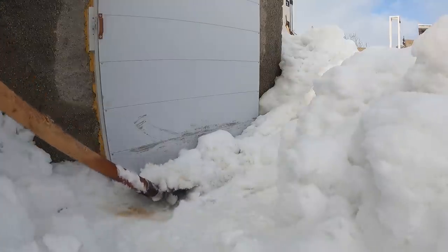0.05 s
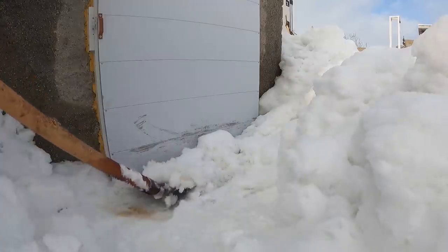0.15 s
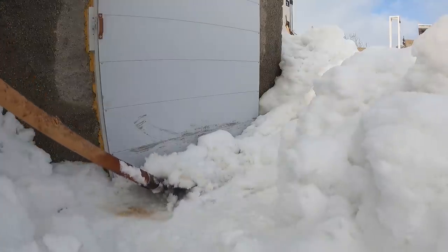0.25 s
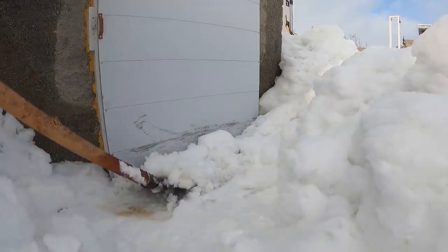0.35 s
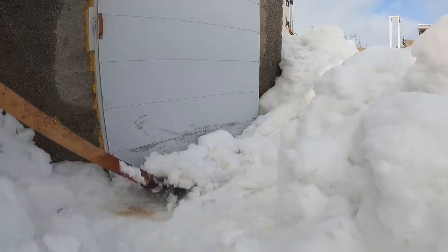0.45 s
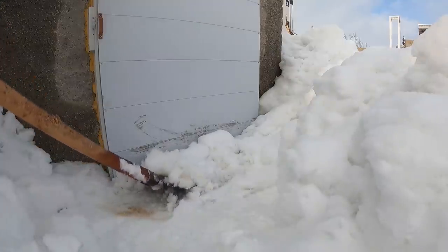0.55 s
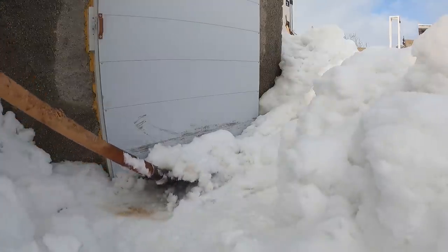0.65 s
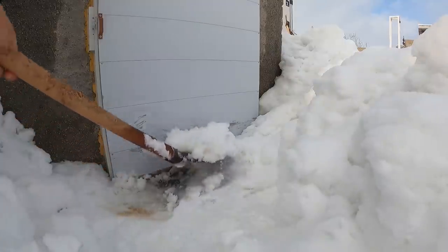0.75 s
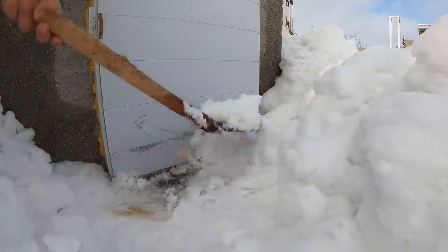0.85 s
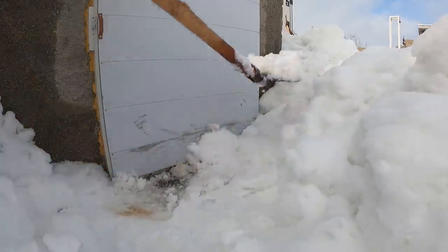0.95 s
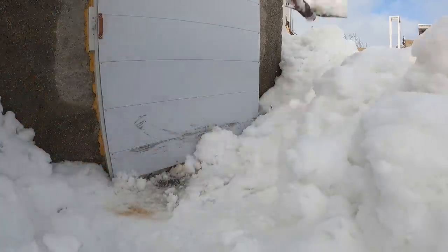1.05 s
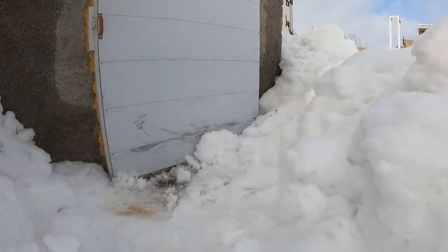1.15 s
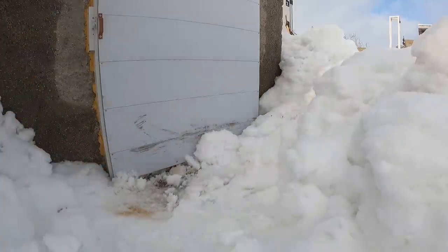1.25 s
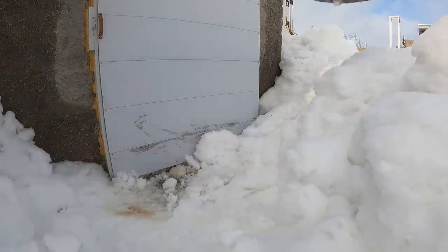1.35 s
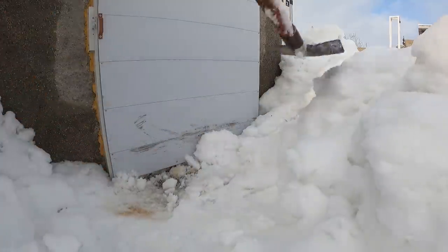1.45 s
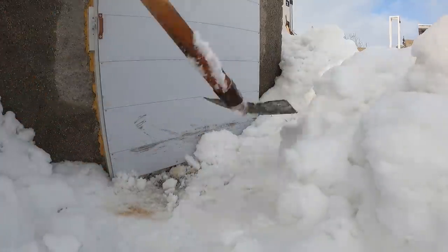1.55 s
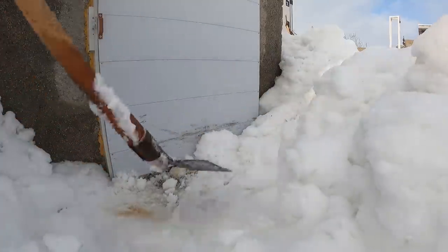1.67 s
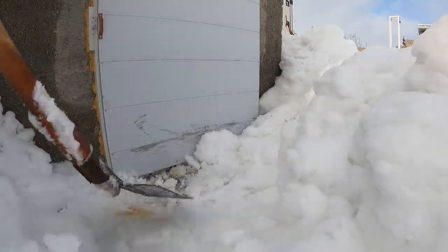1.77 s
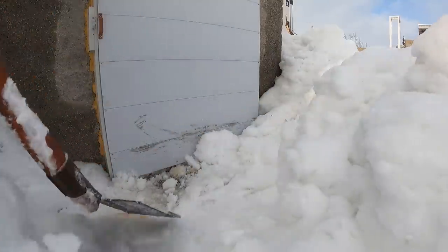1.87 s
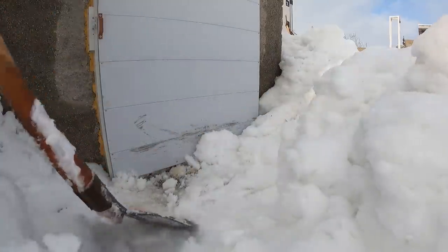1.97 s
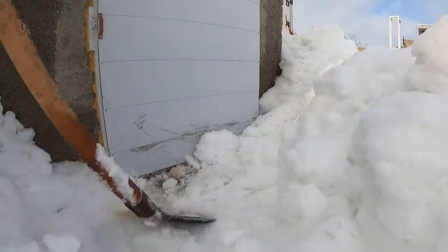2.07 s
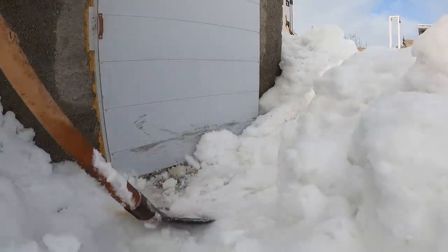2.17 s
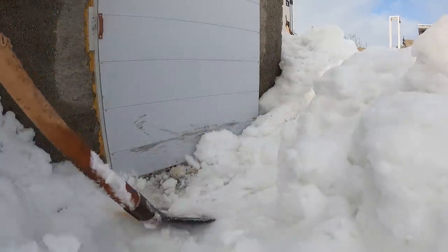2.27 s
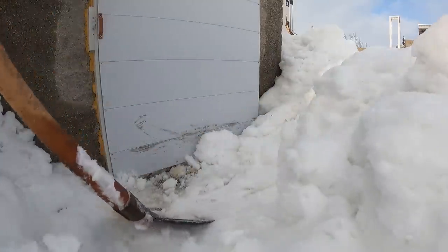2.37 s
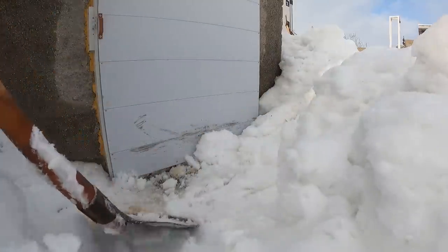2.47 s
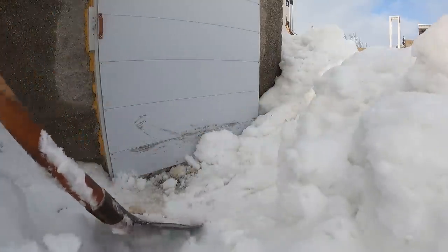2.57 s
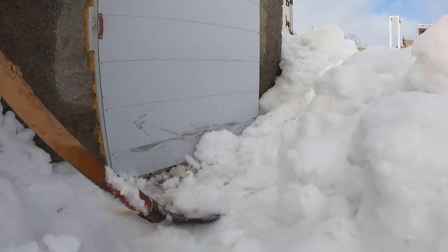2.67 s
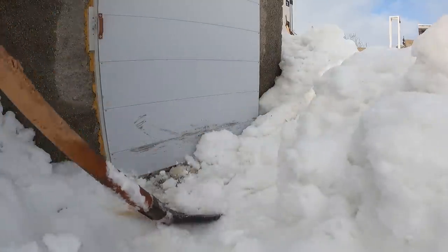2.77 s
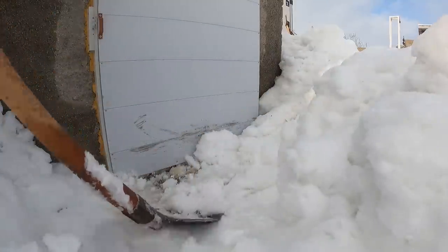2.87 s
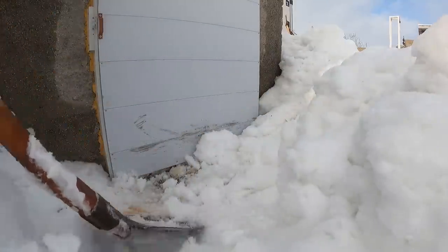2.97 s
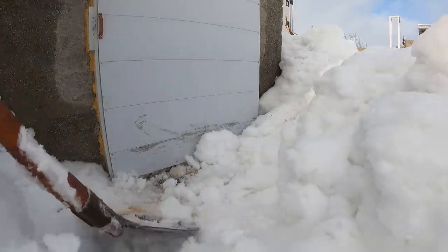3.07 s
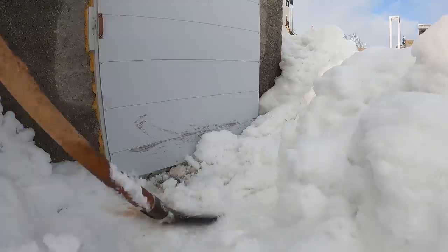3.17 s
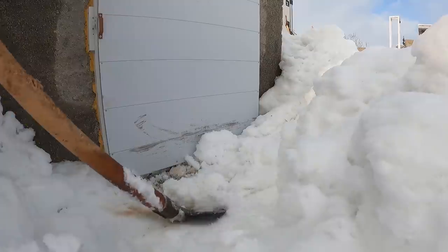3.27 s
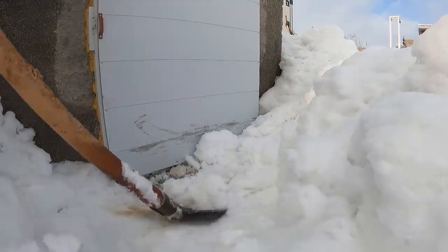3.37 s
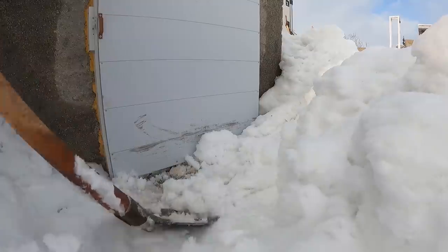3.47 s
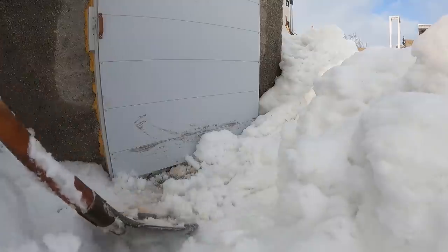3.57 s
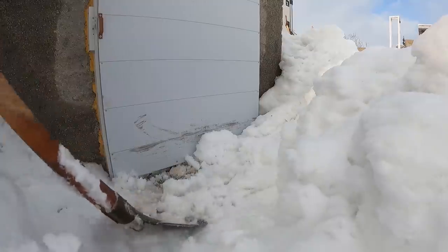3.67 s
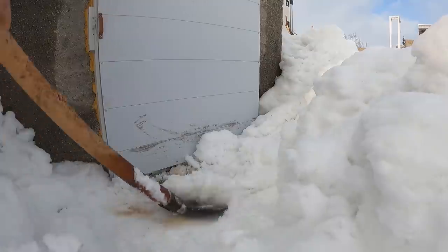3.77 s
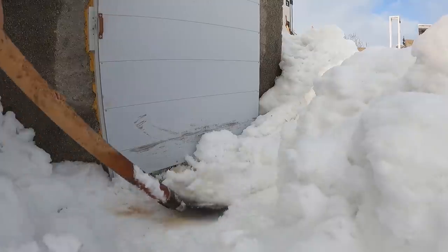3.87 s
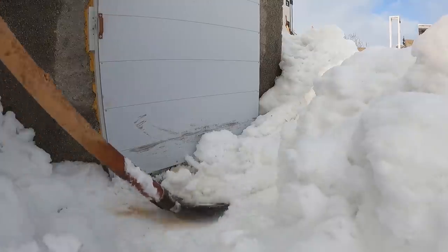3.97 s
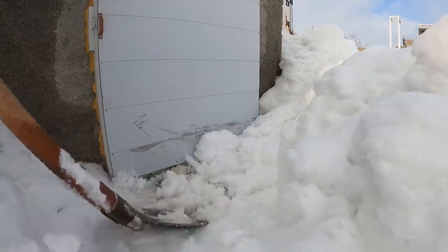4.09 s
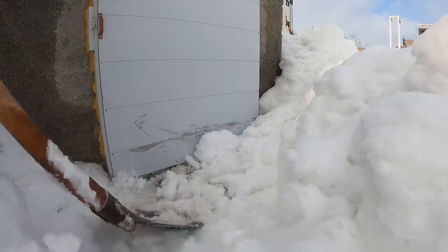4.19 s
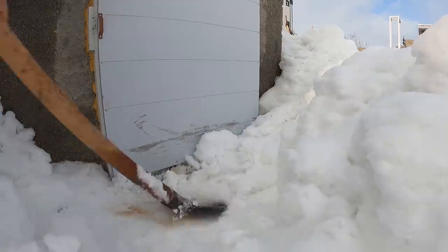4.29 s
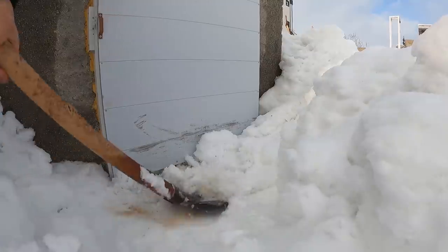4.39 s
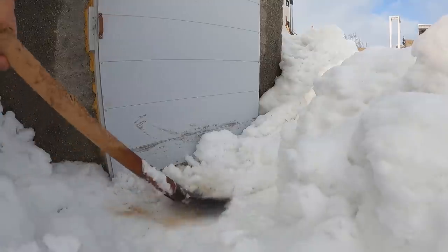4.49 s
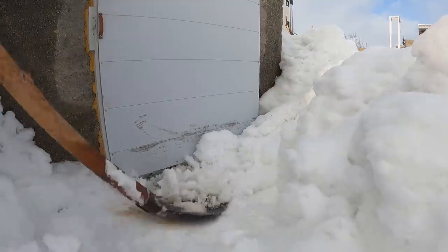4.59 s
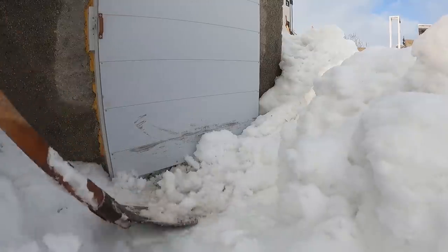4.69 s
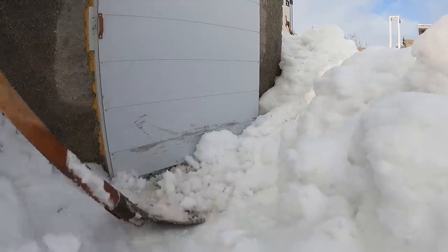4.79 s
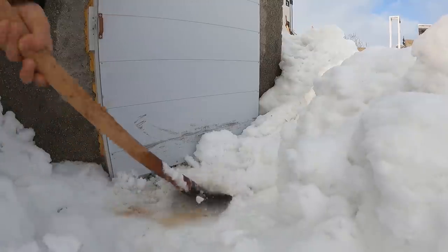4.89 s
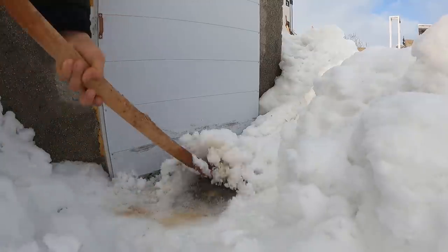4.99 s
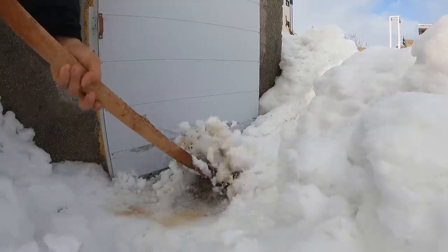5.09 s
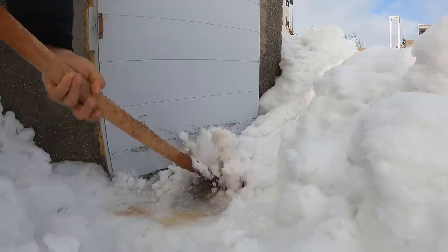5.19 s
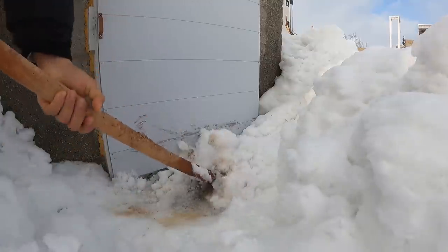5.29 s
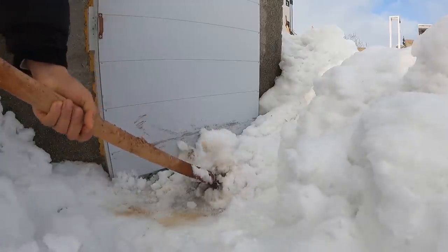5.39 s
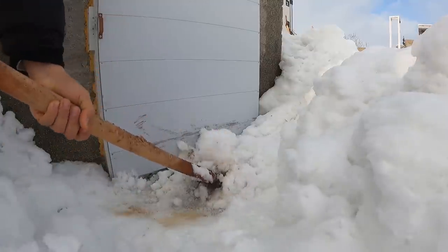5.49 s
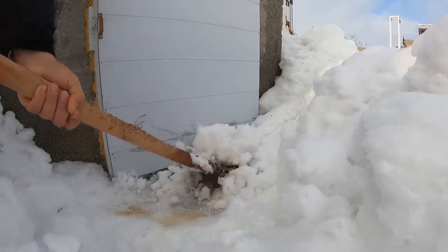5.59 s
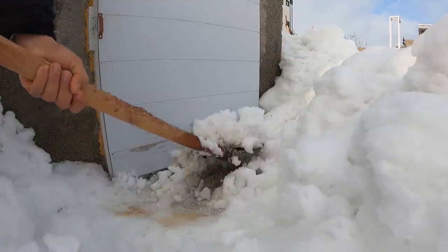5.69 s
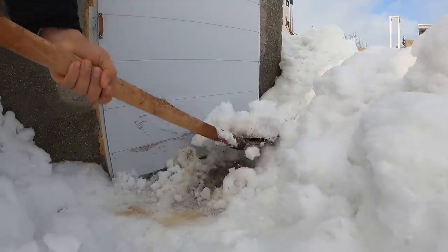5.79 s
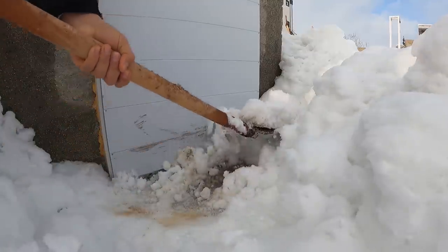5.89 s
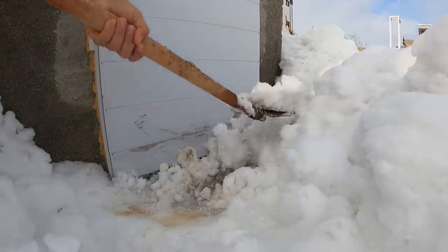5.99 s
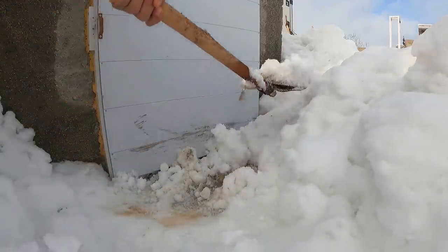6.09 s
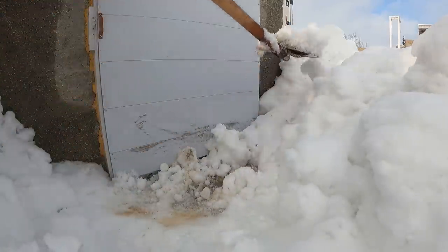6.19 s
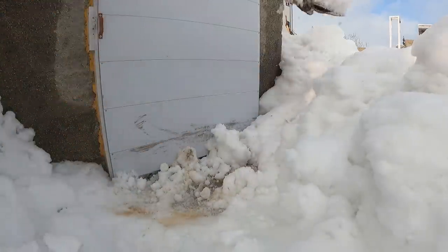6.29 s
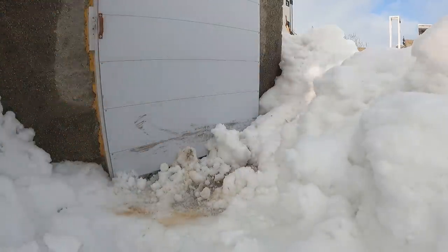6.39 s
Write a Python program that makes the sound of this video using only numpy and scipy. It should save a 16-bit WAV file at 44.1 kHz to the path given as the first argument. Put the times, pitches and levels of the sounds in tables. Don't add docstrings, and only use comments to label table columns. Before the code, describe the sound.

A very close microphone near the ground catches snow shovelling. A load lifts with a dull thump and crumbling, clumps tick and snap, and there is a quiet pause. Then short, bright, gritty stabs crunch at irregular half-second spacing with scraping pulls between. One long hard push peaks, snaps, and trails into handle knocks and trickling powder over a faint outdoor hush.

```python
import sys
import numpy as np
from scipy import signal
from scipy.fft import rfft, irfft, next_fast_len
from scipy.io import wavfile
from scipy.ndimage import uniform_filter1d, map_coordinates

SR = 44100
rng = np.random.default_rng(int(sys.argv[2]) if len(sys.argv) > 2 else 0)


def pcm_store(signal):
    levels = np.round(np.clip(np.atleast_2d(signal), -1, 1) * 32767)
    wavfile.write(sys.argv[1], SR, levels.astype(np.int16).T)


def boost(x):
    u = np.asarray(x, float) / 20
    return 10 ** u


N = 284445
GRID = np.arange(0, N / SR + .002, .001)

# f/Hz, density level/dB
CRYSTALS = [(820, -53.5), (1400, -2), (1490, -1.5), (2250, 1.5), (2750, -1.5), (4030, -2.5), (4970, 0),
            (6210, -4), (7080, -4.5), (11900, -22), (15500, -40)]
# f/Hz, density level/dB
PACKED = [(100, -41), (170, -5.5), (318, -2.5), (483, -0.5), (829, -7.5), (950, -8), (1240, -9),
          (2090, -120)]


def unit(x):
    return x / np.sqrt(np.mean(x ** 2) + 1e-20)


def along(points, hz):
    f, v = np.transpose(points)
    return np.interp(np.log(hz + 1), np.log(f + 1), v)


def wobble(rate):
    return map_coordinates(rng.standard_normal(int(N * rate / SR) + 4), [np.arange(N) * rate / SR])


def filtered(x, response):
    m = next_fast_len(N + SR // 4)
    return irfft(rfft(x, m) * response(np.fft.rfftfreq(m, 1 / SR)), m)[..., :N]


def coloured(x, spectrum):
    return unit(filtered(x, lambda hz: boost(along(spectrum, hz))))


def modes(table):
    def response(f):
        total = 0
        for k, (centre, width, db) in enumerate(table):
            damping = 1j * f * width
            total = total + (-1) ** k * boost(db) * damping / (centre ** 2 - f ** 2 + damping)
        return total
    return response


def grit(per_second, spread_db, smooth):
    chance, size = rng.random((2, N))
    heights = boost(-spread_db * np.log(1 - size)) * rng.choice([-1, 1], N)
    return unit((chance < per_second / SR) * heights) + smooth * rng.standard_normal(N)


def patchy(x, depth_db, bins, frames):
    z = signal.stft(x, nperseg=256)[2]
    field = uniform_filter1d(rng.standard_normal(z.shape), bins, 0)
    field = uniform_filter1d(field, frames, 1)
    return signal.istft(z * boost(depth_db * unit(field)), nperseg=256)[1][:N]


def swell(s, length, db, end_db, rate):
    end = s + length
    hold = np.interp(GRID, [s, end + 1e-4], [db, end_db])
    return hold - rate[0] * np.maximum(s - GRID, 0) - rate[1] * np.maximum(GRID - end, 0)


def loudest(levels):
    return np.interp(np.arange(N) / SR, GRID, np.max(levels, axis=0))


def scrape():
    # f/Hz, density level/dB
    loose = [(820, -45), (1400, -11), (1600, -2.5), (2220, -0.5), (2590, -3), (4880, -5.5), (7290, -8.5),
             (8920, -15.5), (12100, -22.5), (15500, -41.5)]
    # f/Hz, width/Hz, level/dB
    edge_modes = [(996, 260, 0.5), (1200, 170, 4), (1344, 220, -2)]
    # f/Hz, width/Hz, level/dB
    sheet_modes = [(1720, 77, -9), (2314, 36, 7.5), (2994, 66, -11), (5060, 36, 2), (7460, 300, -7.5)]
    hiss_db, edge_db, packed_db = strokes()
    jerk = .7 * wobble(50) + 1.1 * wobble(160)
    breakage = grit(9000, spread_db=2, smooth=.85)
    breakage = patchy(breakage, 2.05, bins=2, frames=5)
    breakage = patchy(breakage, .8, bins=9, frames=10)

    hard = np.clip((hiss_db + 35.5) / 9, 0, 1)
    sheet = modes(sheet_modes)
    crushed = coloured(filtered(breakage, lambda hz: 1 + 0.64 * sheet(hz)), CRYSTALS)
    hiss = hard * crushed + (1 - hard) * coloured(breakage, loose)

    edge = filtered(breakage, modes(edge_modes))
    edge = unit(filtered(edge, modes([(1250, 1020, 0)])))
    crunch = patchy(grit(1200, spread_db=2.0, smooth=1.1), 3.2, bins=1, frames=8)
    crunch = coloured(crunch, PACKED)

    edge_level = hiss_db + edge_db + jerk + 0.69 * wobble(47) - 4.5
    crunch_level = hiss_db + packed_db + 0.5 * jerk + 0.65 * wobble(45) - 1.28
    return boost(hiss_db + jerk + 0.51) * hiss + boost(edge_level) * edge + boost(crunch_level) * crunch


def strokes():
    # t/s, length/s, hiss level/dB, hiss end level/dB
    ploughs = [
        (2.15, .062, -17, -16),
        (2.745, .034, -22, -17),
        (3.272, .042, -21.5, -22.5),
        (3.812, .044, -22, -21.5),
        (4.378, .022, -24.5, -24.5),
        (4.985, .08, -14.5, -16),
        (5.002, .01, -13.5, -13.5),
        (5.065, .066, -16.5, -21),
    ]
    # t/s, length/s, hiss level/dB, hiss end level/dB, crunch level/dB re hiss
    jams = [
        (2.2, .011, -19, -21, 9),
        (2.781, .02, -13, -20, 3),
        (3.315, .033, -13.5, -19, 6),
        (3.858, .05, -13, -17, 2.5),
        (4.401, .052, -13.5, -15, 1.5),
        (4.972, .035, -16, -16, -1),
        (5.134, .003, -36, -36, 4.5),
    ]
    # t/s, length/s, hiss level/dB, hiss end level/dB, edge level/dB re hiss
    pulls = [
        (2.472, .15, -41, -32, 1.5),
        (3.031, 0.105, -28, -33, -5),
        (3.602, .004, -23, -24.5, -1.5),
        (4.167, 0.052, -22, -29, -6),
        (4.742, .06, -26, -28.5, -1),
    ]
    # t/s, length/s, hiss level/dB, hiss end level/dB, crunch level/dB re hiss
    slides = [(.4, .056, -47, -48.5, -1), (.652, 0.16, -43.5, -33, 2), (2.472, 0.019, -42.5, -44, 3.5),
              (4.22, .09, -30.5, -44.5, -3.5), (5.863, 0.059, -29.5, -40, -8), (2.084, .025, -35, -34, -14),
              (2.11, .03, -26, -24, -10), (4.912, .04, -37, -25, -9), (4.954, .02, -18, -14, -8),
              (4.46, .028, -25, -35, 3), (0, .04, -41, -35, 0), (2.857, 0.16, -50.5, -43, -5.5),
              (3.493, 0.085, -49.5, -43.5, -6), (3.64, 0.088, -36.5, -33.5, -8),
              (3.936, 0.16, -50.5, -40, 1.5), (2.7, .035, -36, -29, -9), (3.777, .025, -40, -35, -7),
              (4.339, .03, -34, -26, -8), (4.82, .055, -34, -42, -8), (4.532, .02, -37, -39, -4),
              (3.14, .035, -35, -41, -3), (4.499, .012, -41, -42, -4), (4.52, .006, -41, -41, -6),
              (4.608, 0.072, -46.5, -35, -0.5), (4.661, 0.068, -29.5, -44.5, -7),
              (5.207, 0.14, -48, -34, -7.5), (5.333, .045, -40, -42, 9), (4.09, .05, -44, -51, -8)]
    # t/s, length/s, hiss level/dB, hiss end level/dB, crunch level/dB re hiss
    spills = [(.053, 0.14, -31.5, -42, -2.2), (.19, .06, -45, -44, -2), (.27, .17, -39.5, -47, -2),
              (.808, 0.13, -33.5, -38.5, -8), (.96, .035, -44, -47, -14),
              (1.08, 0.0044, -40.5, -36.5, -17.5), (1.21, 0.1, -46, -44.5, -8.5),
              (1.816, 0.0044, -57, -54.5, -20), (1.92, 0.084, -55.5, -55, -12.5),
              (5.39, .11, -41, -48.5, -5.5), (5.62, 0.069, -43.5, -33.5, -5), (5.72, .03, -30, -33, 1.5),
              (5.76, .085, -37, -42, -4), (5.95, 0.06, -36, -38.5, -5), (6.049, 0.13, -35.5, -43, -7.5),
              (6.183, .045, -35.5, -41.5, -5.5), (6.24, .09, -43, -50, -20), (6.335, .06, -49, -55.5, -29),
              (5.835, .02, -38, -37, -5), (.6, .04, -61, -57, -20), (1.02, .05, -47, -45, -15),
              (1.38, .045, -47, -46, -5), (2.24, .055, -51, -52, -8)]
    # t/s, hiss level/dB
    trickle = [(0, -44), (.445, -50), (.47, -72), (.63, -74), (.655, -52), (1.0, -52), (1.46, -52),
               (1.71, -67), (1.885, -74), (2.07, -61), (2.45, -64), (2.72, -53), (4.56, -56), (5.47, -51),
               (5.576, -62), (5.62, -51), (6.2, -54), (6.45, -60)]
    # (rise, fall) in dB/s
    plough_rate, pull_rate, slide_rate = (420, 2300), (1930, 280), (2400, 600)
    spill_rate, settle_rate = (500, 600), (900, 170)
    jam_rate, mass_rate = (5000, 1000), (5000, 794)

    # hiss level/dB, then edge and crunch level/dB re hiss
    parts = [(np.interp(GRID, *np.transpose(trickle)), -7, -13)]
    parts += [(swell(*row, plough_rate), -5, -7.5) for row in ploughs]
    parts += [(swell(*row, pull_rate), edge, -5.5) for *row, edge in pulls]
    parts += [(swell(*row, slide_rate), -2, crunch) for *row, crunch in slides]
    parts += [(swell(*row, spill_rate), -5.5, crunch) for *row, crunch in spills]
    for s, length, db, end_db, crunch in jams:
        jam = swell(s, length, db, end_db, jam_rate)
        mass = swell(s, length, db, end_db, mass_rate) + crunch
        settle = swell(s + length, 0, -46, -46, settle_rate)
        parts += [(jam, -9, mass - jam), (settle, 2, 2)]

    hiss_db = loudest([level for level, _, _ in parts])
    edge_db = loudest([level + edge for level, edge, _ in parts])
    crunch_db = loudest([level + crunch for level, _, crunch in parts])
    return hiss_db, edge_db - hiss_db, crunch_db - hiss_db


def clumps():
    # t/s, length/s, f/Hz, level/dB,
    # sharpness (Q)
    clump_events = [(0, .03, 1590, -40, 5), (.04, .055, 1300, -35, 2), (.22, .08, 520, -48, 4),
                    (.382, .03, 560, -44, 5), (.435, .05, 500, -52, 4), (.685, .07, 560, -42, 4),
                    (.78, .09, 500, -41, 3), (.885, .07, 4000, -44, 3), (.998, .022, 560, -41, 5),
                    (1.075, .03, 2240, -40, 5), (1.255, .02, 1500, -46, 2), (1.362, .025, 520, -41, 4),
                    (1.47, .03, 1250, -50, 4), (1.605, .045, 1300, -58, 5), (1.71, .025, 1250, -60, 4),
                    (2.083, .05, 1350, -36, 8), (2.145, .06, 1050, -22, 2), (2.525, .04, 1200, -38, 5),
                    (2.59, .06, 1200, -40, 5), (2.6, .05, 2900, -40, 4), (2.778, .012, 6500, -20, 3),
                    (2.83, .03, 1260, -51, 6), (3.035, .035, 1200, -31, 5), (3.09, .025, 4200, -36, 5),
                    (3.32, .04, 2600, -28, 6), (3.57, .03, 1200, -46, 6), (3.603, .015, 2000, -29, 4),
                    (3.605, .04, 1200, -32, 5), (3.862, .035, 4600, -21, 3), (3.995, .05, 520, -43, 4),
                    (4.05, .015, 4500, -39, 3), (4.163, .05, 1120, -22, 5), (4.402, .03, 1300, -22, 4),
                    (4.43, .025, 4600, -21, 3), (4.465, .04, 890, -34, 4), (4.741, .034, 1150, -21.5, 4),
                    (4.778, .022, 1300, -23, 5), (4.805, .015, 1200, -32, 5), (4.958, .04, 1100, -23, 5),
                    (4.995, .04, 4200, -22, 4),
                    (4.172, .05, 520, -27, 2), (4.745, .055, 680, -30, 3), (.81, .055, 320, -34, 3),
                   (5.972, .05, 320, -44, 3), (5.315, .03, 330, -36, 3), (5.035, .05, 1050, -25, 6),
                   (2.255, .05, 1250, -47, 6), (5.82, .04, 1100, -42, 4), (2.7, .07, 1200, -32, 4),
                   (2.795, .025, 900, -26, 3), (5.055, .025, 3300, -21, 5), (5.02, .1, 2200, -26, 7),
                   (5.085, .042, 1200, -24, 5), (5.325, .025, 2240, -35, 5), (5.71, .03, 2200, -36, 3),
                   (5.717, .05, 500, -41, 3), (5.845, .015, 500, -42, 4), (5.858, .055, 1020, -33, 6),
                   (5.865, .035, 2240, -36, 6), (5.945, .05, 2240, -41, 5), (5.99, .03, 1900, -42, 4),
                   (6.03, .06, 3560, -42, 4), (6.066, .012, 4500, -38, 2), (6.18, .025, 1240, -40, 7),
                   (6.185, .02, 3000, -42, 4), (6.285, .04, 1780, -53, 4)]
    out, grains = np.zeros(N + SR), grit(2500, spread_db=2.5, smooth=.5)
    for s, length, hz, db, sharp in clump_events:
        at = round(s * SR)
        u = np.arange(int(1.15 * length * SR) + 64) / (length * SR + 1)
        tuned = signal.iirpeak(hz, sharp, SR)
        ring = signal.lfilter(*tuned, grains[at:at + len(u)])
        ring = signal.lfilter(*tuned, ring)
        envelope = np.clip(np.minimum(u / .15, (1.15 - u) / .45), 0, 1)
        out[at:at + len(u)] += boost(db) * unit(ring) * envelope
    return out[:N]


def cracks():
    # t/s, peak level/dB, knock level/dB re peak, ring f/Hz, t60/s
    crack_events = [(0.386, -26, -3, 1550, 0.068), (0.5349, -40, -28, 1250, 0.03),
                    (0.9985, -15, -16, 1830, 0.044), (1.0796, -20, -43, 2200, 0.03),
                    (1.174, -23.5, -39, 4220, 0.021), (1.2042, -25, -47.5, 2970, 0.028),
                    (1.3595, -16, -30, 2700, 0.04), (1.444, -17, -30, 1200, 0.024),
                    (1.467, -28.5, -21, 1340, 0.042), (1.5423, -30.5, -26, 1220, 0.038),
                    (3.1944, -28, -30, 4000, 0.02), (3.481, -26, -12, 2000, .02),
                    (3.495, -29, -10, 1000, .02), (1.716, -46, -30, 3000, .02), (2.04, -42, -30, 4500, .02),
                    (5.712, -24, -12, 2190, .03), (6.071, -23, -30, 3650, .02),
                    (3.995, -24.5, -2.5, 1030, 0.042), (4.0482, -17.5, -9, 1200, 0.037),
                    (4.0853, -15.5, -26.5, 3810, 0.036), (4.1618, -25, -22, 1090, 0.058),
                    (4.5024, -17.5, -22, 1190, 0.017), (4.5335, -17, -22, 2260, 0.022),
                    (4.6324, -17, -35.5, 3600, 0.03), (4.7411, -10, -28, 1190, 0.026),
                    (5.1812, -18, -15.5, 1620, 0.027), (5.1944, -16, -12.5, 1830, 0.026),
                    (5.3273, -8, -17, 2130, 0.028), (5.8621, -18.5, -18, 1070, 0.035),
                    (5.912, -22, -3.5, 1200, 0.036)]
    out, t = np.zeros(N + SR), np.arange(SR // 8) / SR
    puffs = coloured(rng.standard_normal(N + SR // 8), CRYSTALS)
    lumps = coloured(rng.standard_normal(N), PACKED)
    for s, db, knock_db, hz, t60 in crack_events:
        at, scatter = round(s * SR), rng.standard_normal(4)
        snap = puffs[at:at + len(t)] + .7 * np.sin(2 * np.pi * hz * t)
        knock = 1.14 * lumps[at:at + len(t)]
        for low, r in zip((214, 326, 544, 764), scatter):
            knock = knock + 0.58 * np.sin(2 * np.pi * low * (1 + 0.046 * r) * t)
        burst = boost(db - 11.5 - 60 * t / t60) * snap
        burst += boost(db + knock_db - 5.0 - 60 * t / 0.066) * knock
        out[at:at + len(t)] += burst * (1 - np.exp(-t / 0.00056))
    return out[:N]


def handle():
    # t/s, peak level/dB, f/Hz, t60/s
    knocks = [
        (.9995, -22, 330, .035),
        (1.3622, -27, 400, .03),
        (5.479, -18, 399, 0.027),
        (5.657, -15, 409, 0.029),
        (6.099, -25.5, 573, 0.019),
        (6.157, -26, 780, 0.02),
    ]
    out, t = np.zeros(N + SR), np.arange(SR // 8) / SR
    push = 0.42 * np.sin(2 * np.pi * 110 * t) * boost(-60 * t / 0.051)
    for s, db, hz, t60 in knocks:
        tone = np.sin(2 * np.pi * hz * t) * boost(-60 * t / t60) + push
        out[round(s * SR):][:len(t)] += boost(db + 7.5) * tone * (1 - np.exp(-t / 0.0025))
    return out[:N]


def singing():
    # t/s, f/Hz, level/dB, t60/s
    rings = [(1.46, 3140, -57, 5), (1.625, 4690, -61, .5), (1.55, 5240, -60, .3), (1.55, 8370, -71, .8),
             (1.5, 8830, -66, 1.3), (1.875, 1035, -44, .12), (6.185, 1220, -41, .1),
             (2.084, 2480, -34, .25), (2.26, 1250, -52, .25), (5.84, 1900, -41, .08), (5.87, 2250, -39, .1),
             (1.6, 1300, -60, .3), (5.865, 1100, -36, .1)]
    out, t = np.zeros(N + SR), np.arange(int(.62 * SR)) / SR
    flutter, waver = wobble(45), wobble(130)
    for k, (s, hz, db, t60) in enumerate(rings):
        part = slice(k * SR // 4, k * SR // 4 + len(t))
        fade = boost(db - 60 * t / t60 + 4.5 * flutter[part]) * (1 - np.exp(-t / .008))
        out[round(s * SR):][:len(t)] += fade * np.sin(2 * np.pi * hz * t + 1.9 * waver[part])
    return out[:N]


def even(x, seconds):
    return x / np.sqrt(np.abs(uniform_filter1d(x * x, int(seconds * SR))) + 0.17)


def ground():
    # f/Hz, density level/dB
    deep_spectrum = [(12, -45), (24, -19), (32, -7), (38, 0), (44, -7), (58, -11), (72, -15), (100, -40),
                     (170, -120)]
    # f/Hz, density level/dB
    thud_spectrum = [(38, -15), (65, -6), (119, -1.5), (151, -9.5), (237, -13), (260, -15), (340, -37.5),
                     (570, -120)]
    deep_db, thud_db = jolts()
    deep = coloured(rng.standard_normal(N), deep_spectrum)
    thud = coloured(grit(200, spread_db=3.5, smooth=0.88), thud_spectrum)
    swing = boost(deep_db + 1.2) * even(deep, .07)
    return swing + boost(thud_db - .3 + .9 * wobble(25)) * even(thud, .045)


def jolts():
    # t/s, length/s, deep shake level/dB, thud level/dB
    bumps = [(1.0, .015, -30, -30), (1.362, 0.05, -41, -40), (1.92, .015, -42.5, -46),
             (2.215, .01, -33.5, -15), (2.785, .025, -31.5, -21.5), (3.045, 0.098, -33.5, -33),
             (3.32, 0.043, -34.5, -23.5), (3.615, 0.02, -45, -34.5), (3.862, .05, -36, -24.5),
             (3.996, .01, -42, -45), (4.052, 0.027, -55, -45.5), (4.17, .01, -51, -41),
             (4.405, 0.066, -31, -25), (4.968, 0.12, -39, -32), (5.332, 0.092, -30, -32),
             (5.66, 0.0099, -40, -22), (5.72, 0.022, -39, -30)]
    # t/s, length/s, deep shake level/dB, thud level/dB
    sways = [(.01, 0.009, -40, -17.5), (.06, 0.053, -17.5, -24), (.15, 0.019, -26.5, -37),
             (.26, .03, -32.5, -52), (.385, 0.03, -48, -35), (.46, 0.015, -35, -29), (.31, .05, -50, -43),
             (1.07, .06, -45, -41), (.55, .06, -38, -49.5), (.7, 0.11, -31.5, -25),
             (.85, 0.082, -27.5, -32.5), (1.2, 0.018, -40, -50.5), (1.27, .04, -43, -43),
             (2.89, .02, -55, -44), (3.7, .02, -55, -46), (4.51, .05, -50, -36), (5.24, .06, -55, -45),
             (5.62, .01, -50, -41), (5.98, .04, -45, -35), (1.52, 0.018, -43, -63), (2.05, .02, -38, -45),
             (2.16, .02, -36, -32), (2.32, 0.017, -39, -64), (4.22, .015, -47, -33),
             (4.78, 0.042, -53, -33.5), (5.13, .015, -30, -32), (5.48, .03, -34.5, -42),
             (5.77, 0.034, -31.5, -30.5), (5.86, .06, -36, -35), (6.04, 0.076, -29.5, -46),
             (6.2, 0.082, -38.5, -52.5)]
    # rows, then (rise, fall) in dB/s of shake and of thud
    kinds = ((bumps, (900, 170), (1500, 420)), (sways, (220, 150), (330, 285)))
    shakes, thuds = [], []
    for rows, shake_rate, thud_rate in kinds:
        for s, length, shake_db, thud_db in rows:
            shakes.append(swell(s, length, shake_db, shake_db, shake_rate))
            thuds.append(swell(s, length, thud_db, thud_db, thud_rate))
    return np.maximum(loudest(shakes), -66), np.maximum(loudest(thuds), -72)


def air():
    # f/Hz, density level/dB
    hush = [(71, -39.5), (120, -8.5), (212, -4), (265, -12), (749, -25.5), (918, -36.5), (1220, -6),
            (1440, -15.5), (1660, -17.5), (1870, -30), (6870, -22.5), (11900, -39), (15500, -71)]
    return boost(-58.5 + 0.8 * wobble(9.9)) * coloured(rng.standard_normal(N), hush)


def ports(x):
    # f/Hz, side minus mid level/dB
    apart = [(60, -41.5), (110, -47), (200, -18), (380, -28), (700, -19), (1290, -18.5), (2380, -12.5),
             (4400, -11), (8120, -11.5), (15000, -2)]
    # f/Hz, left minus right level/dB
    lean = [(60, -0.3), (110, 0), (200, -0.3), (380, -0.3), (700, -1.2), (1290, -0.3), (2380, 0.5),
            (4400, 0.8), (8120, 2), (15000, -1.5)]
    scattered = filtered(x, lambda hz: boost(along(apart, hz) + 3.0) * (hz > 90))
    hz, _, z = signal.stft(scattered, SR, nperseg=256)
    phase = -np.pi / 2 + (1.02 + hz[:, None] / 15000) * rng.standard_normal(z.shape)
    side = signal.istft(z * np.exp(1j * phase), SR, nperseg=256)[1][:N]
    halves = np.array([[.5], [-.5]])
    return filtered(np.array([x + side, x - side]), lambda hz: boost(along(lean, hz) * halves))


def scene():
    return ports(scrape() + clumps() + cracks() + handle() + singing() + ground() + air())


def top_cut(x):
    return signal.sosfilt(signal.butter(12, 15660, fs=SR, output="sos"), x)


def record(dry):
    held = dry / (1 + np.abs(dry) ** 8) ** (1 / 8)
    mix = filtered(held, lambda hz: hz < 15600)
    return top_cut(mix)


dry = scene()
out = record(dry)
pcm_store(out)
```